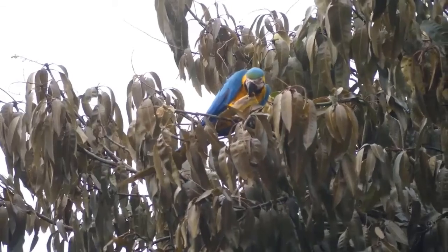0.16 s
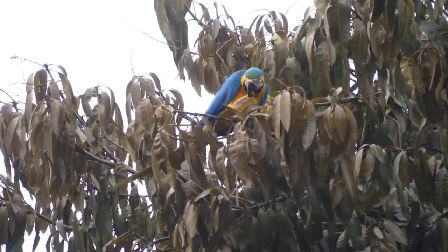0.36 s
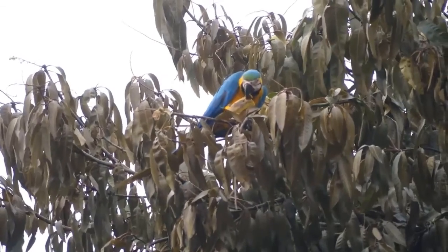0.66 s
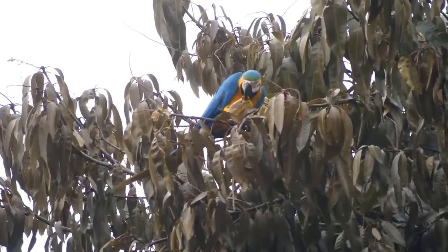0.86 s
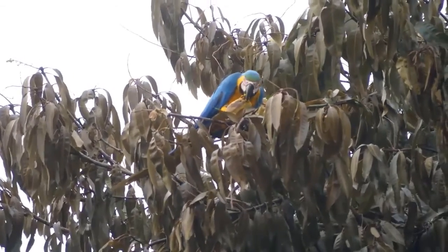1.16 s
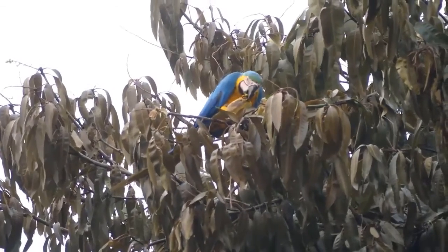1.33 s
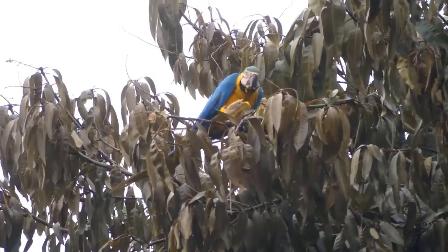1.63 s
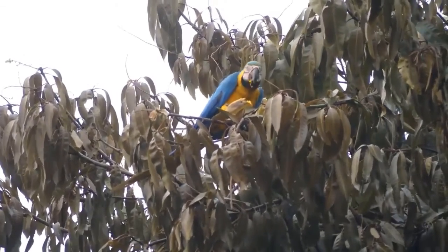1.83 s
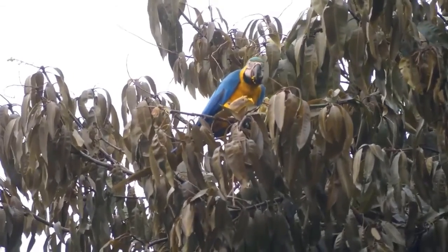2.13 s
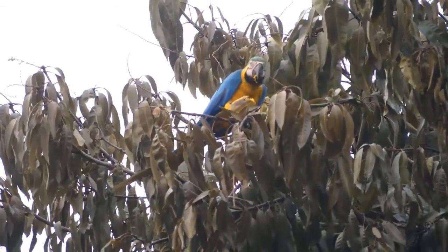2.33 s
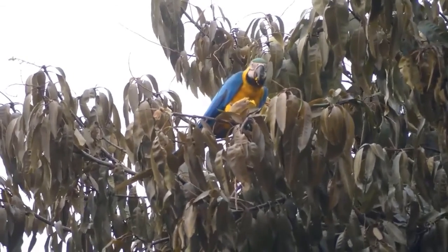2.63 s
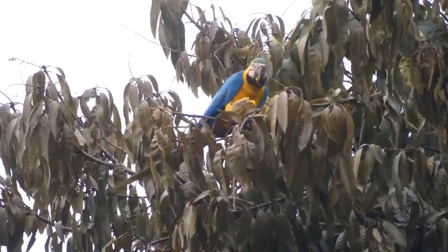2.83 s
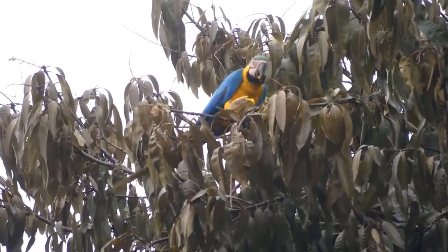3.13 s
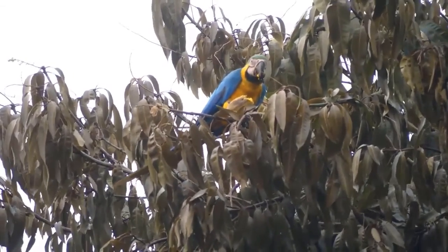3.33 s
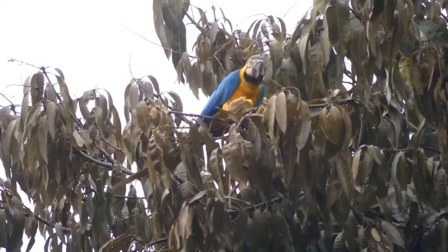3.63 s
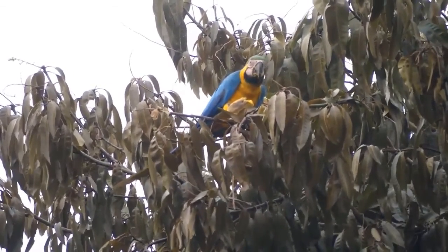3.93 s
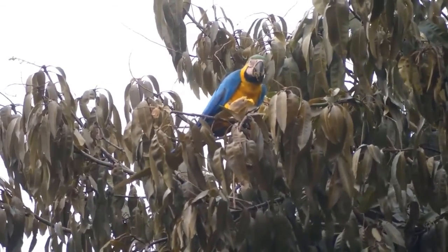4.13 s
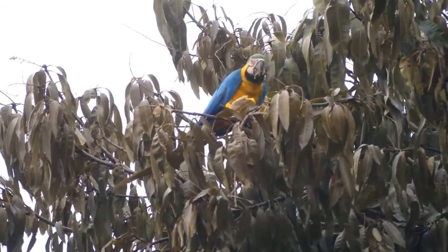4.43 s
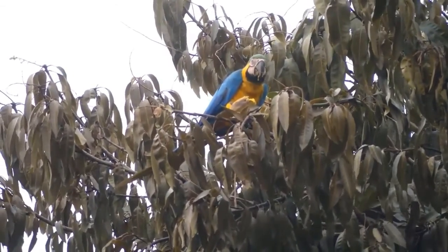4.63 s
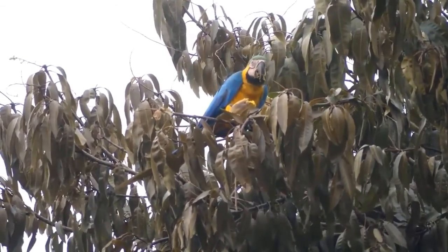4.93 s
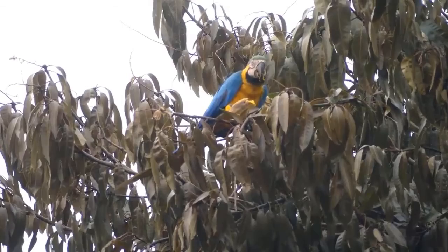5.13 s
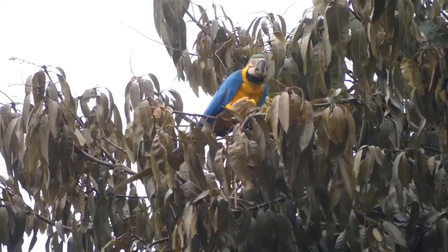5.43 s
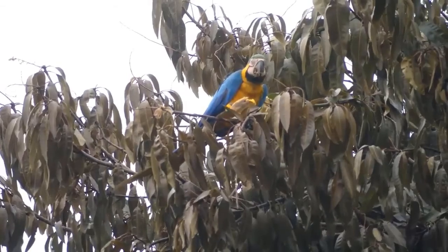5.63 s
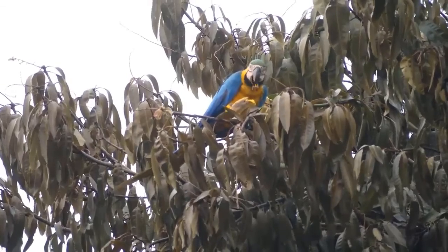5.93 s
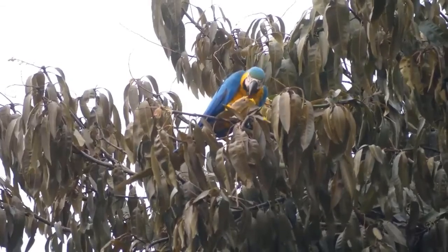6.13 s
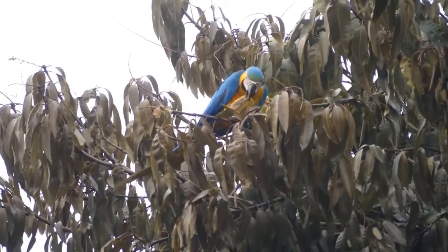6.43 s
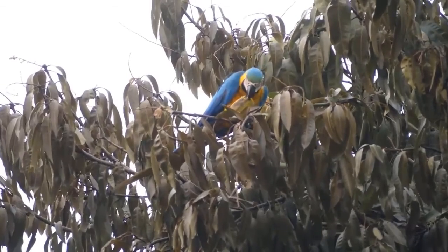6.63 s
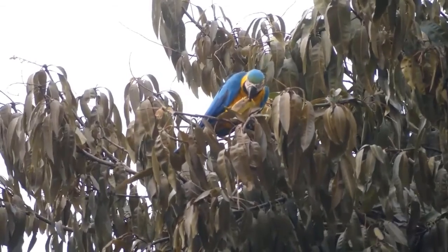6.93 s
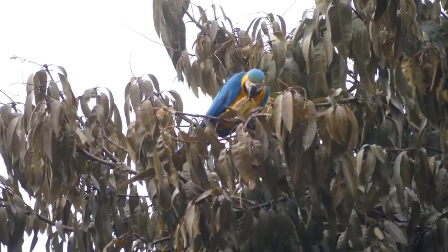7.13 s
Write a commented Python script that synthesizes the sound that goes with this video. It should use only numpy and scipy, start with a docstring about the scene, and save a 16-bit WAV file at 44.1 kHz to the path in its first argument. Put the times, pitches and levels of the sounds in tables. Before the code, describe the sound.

A macaw in a tree gives two stuttering bursts of rough squawks, then pauses while distant birds chirp and one hoots repeatedly. The macaw squawks again, climbing into high squeaks, and ends with three short whistles and a brief hissing rattle. Its calls echo lightly off the trees and stand out above a dull, steady outdoor wash.

```python
"""A macaw in a tree top squawks, squeaks, whistles, rattles and hisses.
Its syrinx jumps from note to note, often with strong-weak cycles; windpipe, throat and beak shape the
overtones. Slow snaps ring the throat, air hisses through the beak, and the trees throw the calls back.
Other birds call far off over the dull wash of the surroundings. Gain control ducks under loud calls."""
import sys
import numpy as np
from scipy import signal
from scipy.fft import rfft, irfft
from scipy.io import wavfile
from scipy.ndimage import uniform_filter1d, map_coordinates

SR = 44100
rng = np.random.default_rng(int(sys.argv[2]) if len(sys.argv) > 2 else 0)


def file_out(sig):
    """Save sig as 16-bit WAV at sys.argv[1]."""
    # one column per channel
    cols = np.atleast_2d(sig).T
    # limit, then scale
    lim = np.clip(cols, -1, 1)
    pcm = np.round(lim * 32767).astype(np.int16)
    wavfile.write(sys.argv[1], SR, pcm)


N = 320166
BAND_LIMIT_HZ, CROSSFADE_SAMPLES = 15020, 290

# syrinx and windpipe response: freq_hz, gain_db
TRACT_RESPONSE = [(150, -43.5), (350, -29.5), (700, -4), (1500, -3.5), (3000, -4.5), (3600, -5.5),
                  (4300, -16), (5500, -24.5), (6800, -28.5), (10000, -39), (15000, -47.5)]
# upper windpipe resonance as the neck moves: time_s, freq_khz
WINDPIPE_RESONANCE = [(1.6, 5.2), (2.8, 4.67), (4.7, 6), (4.95, 5.9), (5.1, 4.8)]
# strong-weak cycles and noise, by voice: alternation_ratio, roughness_ratio, throb_db
VOICE_TEXTURES = {"clear": (0, .1, 1), "husky": (.15, .45, 1.5), "hum": (.2, .2, 1),
                  "doubled": (.7, .14, 1), "hoarse": (.3, .55, 3), "rasp": (.75, .5, 3),
                  "squeak": (0, .12, 3.5), "whistle": (0, .12, 1.4), "yelp": (0, .08, 1),
                  "croak": (.8, .3, 2)}
# overtone balance, by voice: tilt_db_per_octave, second_harmonic_db
VOICE_COLOURS = {"clear": (0.5, -.1), "husky": (0, -.1), "hum": (-3.3, -.1), "doubled": (-0.12, -.1),
                 "hoarse": (-1.7, -.1), "rasp": (-0.11, -.1), "squeak": (1.9, -5), "whistle": (0.24, 0.7),
                 "yelp": (-4, 3.3), "croak": (-.1, -.1)}
def syrinx(mix, contour, voice, throat_khz, beak_khz):
    """Harmonics and half orders, shaped by the tract; rough notes wobble and turn to breath."""
    alternation, roughness, throb_db = VOICE_TEXTURES[voice]
    tilt_db_per_octave, second_harmonic_db = VOICE_COLOURS[voice]
    start_s = contour[0][0]
    pitch_hz, level_db = per_sample(contour, CROSSFADE_SAMPLES)
    n = len(pitch_hz)
    pipe_khz = np.interp(start_s, *np.transpose(WINDPIPE_RESONANCE))
    formants = [(throat_khz, 0.25, 5), (beak_khz, 0.2, 2.5), (pipe_khz, 0.31, 2.06)]

    def tract_db(hz):
        peaks = 1 + sum(gain / (1 + ((hz / 1000 - centre_khz) / half_width_khz) ** 2)
                        for centre_khz, half_width_khz, gain in formants)
        tilt_db = tilt_db_per_octave * np.log2(hz / 1500 + 0.049)
        return curve_at(TRACT_RESPONSE, hz) + 20 * np.log10(peaks) + tilt_db

    jitter = (0.004 + 0.06 * roughness) * wander(n, size=90)
    cycles = np.cumsum(pitch_hz * (1 + jitter)) / SR
    orders = np.arange(1, 41)[:, None] / 2
    partial_hz = orders * pitch_hz
    rolloff_db = 8.1 * np.log10(1 + (orders / 2.76) ** 2)  # the folds close softly
    dulling_db = 0.048 * (level_db.max() - level_db) * np.log2(1 + orders)  # softer is duller
    shimmer_db = np.array([wander(n, size=200) for _ in orders]) * np.clip(orders - 0.6, 0, 4.5)
    partial_db = tract_db(partial_hz) - rolloff_db - dulling_db + shimmer_db
    partial_db += second_harmonic_db * (orders == 2)
    gains = gain_of(partial_db) * np.where(orders % 1, alternation, 1) * (partial_hz < BAND_LIMIT_HZ)
    scatter_rad = 2.4 * (rng.random(orders.shape) - 0.5)  # leaves and near echoes
    tone = unit_rms((gains * np.cos(2 * np.pi * orders * cycles + scatter_rad)).sum(0))
    breath = shaped_noise(n, lambda hz: tract_db(hz) - 10 * np.log10(1 + (hz / 2800) ** 5))
    breath = unit_rms(breath * (1 + 0.24 * np.cos(np.pi * cycles)))
    sound = np.sqrt(1 - roughness ** 2) * tone + roughness * breath
    throb = unit_rms(gain_of(throb_db * np.clip(wander(n, size=110), -3, 1)))  # the air stream falters
    fade = np.sqrt(signal.windows.tukey(n, 2 * CROSSFADE_SAMPLES / n))
    add(mix, start_s - CROSSFADE_SAMPLES / SR, gain_of(level_db) * sound * throb * fade)


# squawk notes: start_s, length_s, first_hz, last_hz, level_db, swell_db, voice, throat_khz, beak_khz
SQUAWK_NOTES = [ (1.535, 0.011, 684, 734, -50, 7, "husky", 1, 1.7),
                (1.552, .008, 698, 726, -30.5, 0, "yelp", 1.83, 0.87),
                (1.566, 0.044, 1018, 967, -33, 7, "yelp", 2.0, 3.0),
                (1.606, 0.027, 777, 851, -23, 3, "yelp", 1.65, .8),
                (1.64, 0.062, 601.4, 598.6, -21.5, -5.5, "hoarse", 1.38, 2.6),
                (1.705, 0.053, 634, 723, -36.5, 8.5, "hoarse", 1, 2.4),
                (1.762, 0.037, 830, 1045, -20.5, -5, "doubled", 1.58, 3.05),
                (1.809, 0.048, 697.5, 712, -29, -4, "hum", 1.28, 2.8),
                (1.867, 0.032, 666, 683, -28, -4, "hum", 1.35, 3.3),
                (1.912, 0.027, 673, 645, -27.5, -2, "hum", 1.27, 4.2),
                (1.95, 0.028, 658, 671, -28.5, 0, "doubled", 1.36, 2.7),
                (1.985, 0.013, 947, 893, -32, -0.5, "doubled", 1.54, .95),
                (2.009, 0.047, 737.4, 688, -22.5, -8, "doubled", 1.47, 4.36),
                (2.334, 0.031, 596, 757, -41.5, -1, "husky", 0.5, 1.5),
                (2.374, 0.035, 845, 870, -27.5, -2.5, "rasp", 1.46, 0.61),
                (2.412, 0.026, 1051, 986, -20.5, -4, "rasp", 1.68, 3.2),
                (2.45, 0.043, 931, 883, -20.5, -13, "hoarse", 2.01, 2.97),
                (2.497, 0.019, 941, 972, -20, -4, "rasp", 2, 3.4),
                (2.518, 0.033, 961, 963, -20.5, -3, "clear", 1.9, 1.67),
                (2.564, 0.031, 890, 900, -22, -9, "rasp", 1.9, 2.55),
                (2.584, 0.037, 877.4, 864, -28, 5, "rasp", 1.92, 2.5),
                (2.629, 0.01, 1030, 993, -24, 0.5, "croak", 2.34, 1.34),
                (2.649, 0.0233, 1024, 968, -24.5, -0.5, "croak", 2.4, 2.4),
                (2.679, 0.017, 986, 914, -31, -5, "hoarse", 1.26, 3.8),
                (2.718, 0.025, 972, 1026, -43, 9, "hoarse", 1.5, 2.0),
                (2.758, 0.06, 786, 858, -29.5, -7.5, "husky", 1.39, 3.0),
                (4.632, 0.031, 890, 1020, -40, -0.5, "hum", 0.66, 1.2),
                (4.672, 0.061, 1031, 1077, -44.5, 8.5, "husky", 0.83, 2.3),
                (4.724, 0.011, 987, 930, -28.5, 1.5, "husky", 1.12, 1.9),
                (4.734, 0.028, 829, 844, -26, 4, "croak", 2.3, 1.05),
                (4.77, 0.023, 833, 897, -25, 1.5, "croak", 2.23, 0.67),
                (4.804, 0.06, 851.5, 804, -25.5, -5.5, "doubled", 1.46, 3.1),
                (4.861, 0.047, 681, 773, -27.5, 0, "doubled", 1.97, 2.7),
                (4.903, .02, 762, 697, -32.5, -10, "doubled", 1.6, 2.4),
                (5.032, 0.034, 956, 960, -44, -1, "clear", 1.4, 2.8),
                (5.052, 0.028, 1158, 1267, -37.5, 4.5, "clear", 1.2, 2.4),
                (5.085, 0.0062, 1556, 1426, -23.5, 2, "clear", 1.45, 2.9),
                (5.1, 0.01, 1363, 1265, -23, -6.5, "rasp", 1.6, 2.9),
                (5.113, 0.027, 1042, 957, -26, -2.5, "clear", 2.0, 1.0),
                (5.585, 0.0053, 1440, 1745, -39.5, 7, "hum", 1.9, 3.4),
                (5.597, 0.02, 1782, 1650, -30, -2.5, "hum", 1.7, 3.4),
                (5.621, 0.039, 1055, 1012, -38, 7, "clear", 1.38, 3.1),
                (5.655, 0.0078, 982, 907, -28.5, 8, "rasp", 1.7, 2.6),
                (5.669, 0.05, 1000, 1065, -23, -2.5, "doubled", 2.76, 1.8),
                (5.723, 0.024, 1320, 1480, -28, -6.5, "clear", 1.63, 2.7),
                (5.755, 0.024, 1902, 2030, -32.5, 3, "clear", 2.0, 3.9),
                (6.601, 0.03, 1843, 1560, -39, -0.5, "hum", 1.9, 3.5)]
def squawks(mix):
    """Glides, each under one puff of effort that bends level and pitch down at both ends."""
    progress = np.linspace(0, 1, 9)
    slack = (2 * progress - 1) ** 4
    for start_s, length_s, first_hz, last_hz, level_db, swell_db, *timbre in SQUAWK_NOTES:
        pitch_hz = (first_hz + (last_hz - first_hz) * progress) * (1 - 0.03 * slack)
        envelope_db = level_db + swell_db * progress - 6 * slack
        syrinx(mix, np.transpose([start_s + length_s * progress, pitch_hz, envelope_db]), *timbre)


# squeaks: start_s, climb_s, first_hz, top_hz, top_db, swell_db
SQUEAK_NOTES = [(5.144, 0.034, 2322, 2710, -21.5, -2), (5.212, 0.046, 2050, 2660, -26, 1.5),
                (5.782, 0.051, 2150, 2617, -19, 9.5), (5.846, 0.018, 2250, 2755, -25, 0),
                (5.884, 0.016, 2057, 2510, -32, -5), (5.914, 0.011, 2355, 2640, -28, -3)]
def squeaks(mix, break_s=0.014):
    """Climbs that round off at the top, then the voice breaks downward and dies."""
    for start_s, climb_s, first_hz, top_hz, top_db, swell_db in SQUEAK_NOTES:
        t = np.arange(0, climb_s + break_s, 1 / SR)
        below = np.clip(1 - t / climb_s, 0, 1)
        broken = np.clip((t - climb_s) / break_s, 0, 1)
        pitch_hz = top_hz - (top_hz - first_hz) * below ** 1.28 - 0.18 * top_hz * broken ** 1.4
        envelope_db = top_db - swell_db * below - 15 * broken
        contour = np.transpose([start_s + t, pitch_hz, envelope_db])
        syrinx(mix, contour, "squeak", throat_khz=2.576, beak_khz=8.4)


# whistles: start_s, length_s, top_hz, level_db
WHISTLE_NOTES = [(6.203, 0.19, 2179, -22), (6.711, 0.18, 2221, -21.5), (7.106, 0.19, 2114, -26.5)]
def whistles(mix, rise_s=0.026, drop_s=0.0107, swell_s=0.027, close_s=0.05):
    """Arches: pitch and level settle on the top, hold, and drop as the syrinx closes."""
    for start_s, length_s, top_hz, level_db in WHISTLE_NOTES:
        t = np.arange(0, length_s, 1 / SR)
        pitch_hz = top_hz * (1 - 0.3 * np.exp(-t / rise_s) - 0.29 * np.exp((t - length_s) / drop_s))
        envelope_db = level_db - 16 * np.exp(-t / swell_s) - 14.5 * np.exp((t - length_s) / close_s)
        contour = np.transpose([start_s + t, pitch_hz, envelope_db])
        syrinx(mix, contour, "whistle", throat_khz=2.22, beak_khz=4.1)


# snap train: time_s, rate_hz, level_db
RATTLE_CONTOUR = [(6.5, 115, -45), (6.52, 104, -37.5), (6.57, 104, -40), (6.605, 104, -47)]
# throat modes: freq_hz, width_hz, gain_db
THROAT_MODES = [(1860, 210, -12), (2530, 420, 0.5), (3800, 700, -2.5), (5070, 870, -3)]
def rattle(mix, attack_s=0.00096):
    """Slow snaps of the syrinx ring the throat."""
    rate_hz, level_db = per_sample(RATTLE_CONTOUR)
    cycles = np.cumsum(rate_hz) / SR + 0.71
    snaps = np.diff(np.floor(cycles), prepend=0)
    snaps *= gain_of(level_db + 1.6 * rng.standard_normal(len(snaps)))
    t = np.arange(900) / SR
    ring = sum(gain_of(gain_db) * np.exp(-np.pi * width_hz * t) * np.sin(2 * np.pi * freq_hz * t)
               for freq_hz, width_hz, gain_db in THROAT_MODES)
    ring *= np.minimum(t / attack_s, 1)
    ring *= np.sqrt(SR / rate_hz.mean()) / np.linalg.norm(ring)
    add(mix, RATTLE_CONTOUR[0][0], signal.fftconvolve(snaps, ring))


# air through the beak: time_s, level_db
HISS_CONTOUR = [(6.505, -51), (6.573, -35), (6.593, -36), (6.645, -48.5)]
# pipe modes: freq_hz, width_hz, gain_db
HISS_MODES = [(2640, 510, 5), (3660, 660, 1), (5300, 980, 3.5), (7600, 690, -12.5), (10060, 1400, -18.5),
              (12900, 840, -36)]
def hiss(mix):
    """Air hisses through the beak, coloured by the pipe modes of the throat."""
    def modes_db(hz):
        return 20 * np.log10(sum(gain_of(gain_db) / (1 + (2 * (hz - freq_hz) / width_hz) ** 2)
                                 for freq_hz, width_hz, gain_db in HISS_MODES))

    level_db, = per_sample(HISS_CONTOUR)
    n = len(level_db)
    gusts = gain_of(1.4 * wander(n, size=80))
    air = unit_rms(shaped_noise(n, modes_db) * gusts)
    add(mix, HISS_CONTOUR[0][0], gain_of(level_db) * air * signal.windows.tukey(n, 0.1))


# echo decay: freq_hz, t60_s
TREE_DECAY = [(500, 1), (1500, 1), (2600, 0.7), (5000, 0.66), (10000, 0.13)]
def tree_echoes(sound, onset_s):
    """Sparse echoes from trunks and leaves, each band dying at its own speed."""
    taps = np.zeros(SR)
    delay_samples = np.arange(0, SR - 20, 20) + rng.integers(0, 20, (SR - 1) // 20)
    signs = rng.choice([-1., 1.], len(delay_samples))
    taps[delay_samples] = signs * np.clip(delay_samples / SR / onset_s, 0, 1)
    hz, t, spectra = signal.stft(taps, SR, nperseg=256)
    decay = gain_of(-60 * t / curve_at(TREE_DECAY, hz)[:, None])
    tail = signal.istft(spectra * decay, SR, nperseg=256)[1]
    echo = signal.fftconvolve(sound, tail / np.linalg.norm(tail))[:N]
    sway_samples = 2.5 * wander(N, size=250)  # moving leaves shift the paths
    return map_coordinates(echo, [np.arange(N) + sway_samples], order=3)


# far chirps: start_s, length_s, first_hz, middle_hz, last_hz, level_db
FAR_CHIRPS = [(.01, 0.029, 1780, 1830, 1950, -50), (0.097, 0.029, 1720, 1744, 1630, -53),
              (0.136, 0.058, 3070, 2850, 2520, -63), (0.163, 0.09, 3180, 3100, 2830, -58),
              (.302, 0.075, 2480, 2230, 1910, -60), (0.407, 0.17, 2630, 2526, 2410, -61.5),
              (0.542, .06, 2370, 2140, 1860, -60), (0.597, .068, 2320, 2560, 2530, -60.5),
              (.875, 0.052, 2330, 2470, 2450, -60), (1.096, .1, 2000, 2050, 1860, -58.5),
              (1.163, 0.055, 2850, 2550, 2110, -68), (1.283, 0.12, 2830, 2750, 2500, -68),
              (1.405, 0.063, 2700, 2830, 2770, -69), (2.902, 0.043, 5900, 6060, 5300, -57),
              (2.906, 0.026, 6800, 7440, 7360, -58.5), (2.934, 0.02, 5480, 6960, 8500, -63),
              (3.17, 0.072, 2770, 2400, 2220, -60), (3.287, .12, 2077, 2020, 2010, -46),
              (3.3, 0.15, 2720, 2590, 2440, -68), (3.486, 0.052, 2530, 2350, 2230, -60),
              (3.494, 0.11, 3050, 2560, 1900, -61), (3.693, 0.19, 1996, 1978, 1977, -48.5),
              (3.9, 0.11, 2780, 2820, 2800, -66), (4.006, 0.1, 3130, 2980, 2500, -65),
              (4.092, .045, 2250, 1990, 1900, -53), (4.119, 0.13, 1800, 1860, 1916, -50),
              (4.167, 0.14, 2500, 2340, 2220, -64), (4.363, 0.22, 2860, 3030, 2760, -53.5),
              (4.425, 0.29, 1980, 1792, 1780, -54.5), (6.154, 0.044, 3020, 3130, 3100, -56.5),
              (6.95, .07, 2930, 3160, 3000, -66)]
# one bird's falling hoots: start_s, level_db
FAR_HOOTS = [(3.09, -54.5), (3.395, -53.5), (3.709, -52), (4.009, -53.5), (4.315, -53.5), (4.6, -51),
             (5.491, -49.5), (6.11, -51.5)]
def far_birds(mix):
    """Scattered chirps and one repeated hoot."""
    for start_s, *chirp in FAR_CHIRPS:
        add(mix, start_s, far_call(*chirp))
    for start_s, level_db in FAR_HOOTS:
        hoot = far_call(length_s=0.1, first_hz=1470, middle_hz=1420, last_hz=1330, level_db=level_db)
        add(mix, start_s, hoot)


def far_call(length_s, first_hz, middle_hz, last_hz, level_db):
    """A near sine gliding on an arc, flickering on its long way through the leaves."""
    n = round(max(length_s, 0.02) * SR)
    position = np.linspace(-1, 1, n)
    bend_hz = (first_hz + last_hz) / 2 - middle_hz
    pitch_hz = middle_hz + (last_hz - first_hz) / 2 * position + bend_hz * position ** 2
    phase_rad = 2 * np.pi * np.cumsum(pitch_hz) / SR
    tone = np.sqrt(2) * (np.sin(phase_rad) + 0.056 * np.sin(2 * phase_rad))
    flicker = gain_of(2.5 * wander(n, size=300))
    return gain_of(level_db) * tone * flicker * signal.windows.tukey(n, 0.5)


# background spectrum: freq_hz, density_db
WASH_SPECTRUM = [(88, -76), (150, -24), (262, -63.5), (306, -8.5), (350, 4), (1090, -5), (1400, -6.5),
                 (1690, -8), (1970, -10.5), (2170, -12), (2740, -14), (3510, -23), (4020, -23),
                 (14900, -38)]
def wash(level_db=-49.5):
    """Dull noise of the surroundings, with drifting patches and a slow swell."""
    frames, hz = N // 256 + 5, np.fft.rfftfreq(1024, 1 / SR)
    real, imag, patches = rng.standard_normal((frames, 513, 3)).T
    patches = unit_rms(uniform_filter1d(uniform_filter1d(patches, size=14, axis=0), size=12, axis=1))
    swell_db = 0.5 * wander(frames, size=25)
    spectra = (real + 1j * imag) * gain_of(curve_at(WASH_SPECTRUM, hz)[:, None] + 1.4 * patches + swell_db)
    return gain_of(level_db) * unit_rms(signal.istft(spectra, nperseg=1024, noverlap=768)[1][:N])


def gain_of(db):
    return 10 ** (np.asarray(db) / 20)


def unit_rms(x):
    return x / np.sqrt(np.mean(x ** 2) + 1e-20)


def curve_at(points, hz):
    freq_hz, values = np.transpose(points)
    return np.interp(np.log(hz + 1), np.log(freq_hz + 1), values)


def add(mix, start_s, sound):
    part = mix[round(start_s * SR):][:len(sound)]
    part += sound[:len(part)]


def wander(n, size):
    """Random drift of rms 1, changing over about size steps."""
    return unit_rms(uniform_filter1d(uniform_filter1d(rng.standard_normal(n), size), size))


def shaped_noise(n, db_at):
    """Noise of rms 1 with the spectrum db_at(hz)."""
    hz = np.fft.rfftfreq(n, 1 / SR)
    return unit_rms(irfft(rfft(rng.standard_normal(n)) * gain_of(db_at(hz)), n))


def per_sample(contour, hold_samples=0):
    """Columns interpolated along the first (time_s), ends held."""
    time_s, *columns = np.transpose(contour)
    t = np.arange(time_s[0] - hold_samples / SR, time_s[-1] + hold_samples / SR, 1 / SR)
    return [np.interp(t, time_s, column) for column in columns]


def scene():
    """Macaw and far birds with their echoes, over the wash; mono."""
    macaw, others = np.zeros((2, N))
    for call in (squawks, squeaks, whistles, rattle, hiss):
        call(macaw)
    far_birds(others)
    macaw += gain_of(-14) * tree_echoes(macaw, onset_s=0.004)
    others += gain_of(-15.5) * tree_echoes(others, onset_s=0.02)
    return (macaw + others + wash())[None]


def record(dry):
    """Wind filter, gain control that ducks under loud calls, faint rumble, band limit."""
    low_cut_hz, threshold_db, release_db_per_s = 292, -29.5, 16.6
    cut = signal.sosfilt(signal.butter(8, low_cut_hz, "high", fs=SR, output="sos"), dry)
    power_db = 10 * np.log10(abs(uniform_filter1d(cut[0] ** 2, size=1500)) + 1e-12)
    release_db = np.arange(N) * release_db_per_s / SR
    held_db = np.maximum.accumulate(power_db + release_db) - release_db
    over_db = np.maximum(held_db - threshold_db, 0)
    ducked = cut / gain_of(0.69 * uniform_filter1d(over_db, size=800))
    rumble = shaped_noise(N, lambda hz: -20 * np.log10(1 + (hz / 300) ** 2))
    rumble *= gain_of(-100 + 4.5 * wander(N, size=1500))
    lowpass = signal.firwin(511, BAND_LIMIT_HZ, window=("kaiser", 9), fs=SR)
    return signal.oaconvolve(ducked + rumble, lowpass[None], "same")


dry = scene()
out = record(dry)
file_out(out)
```